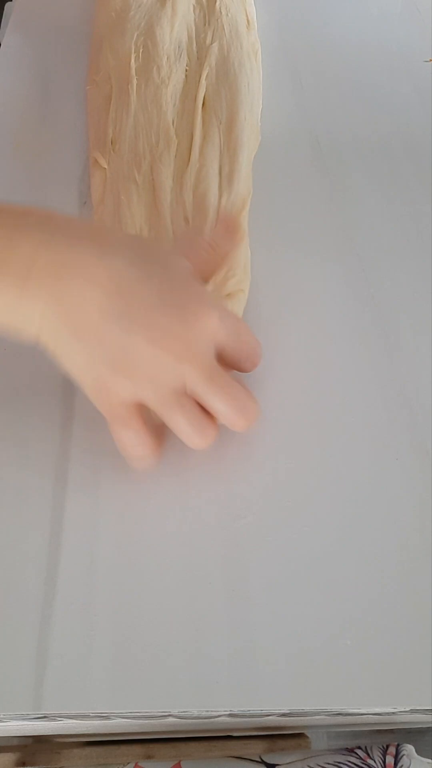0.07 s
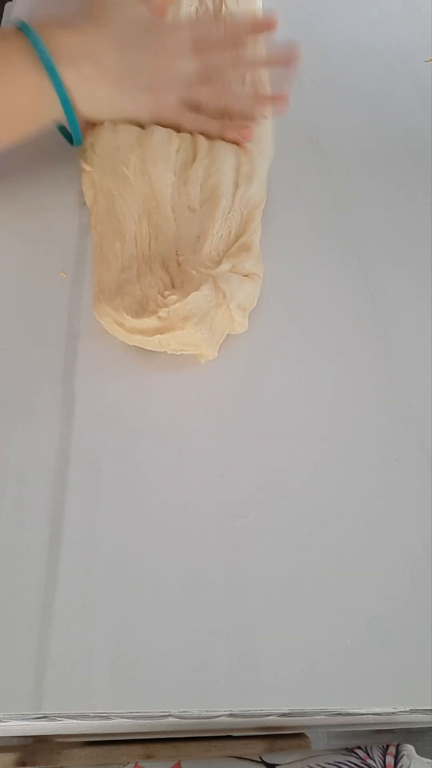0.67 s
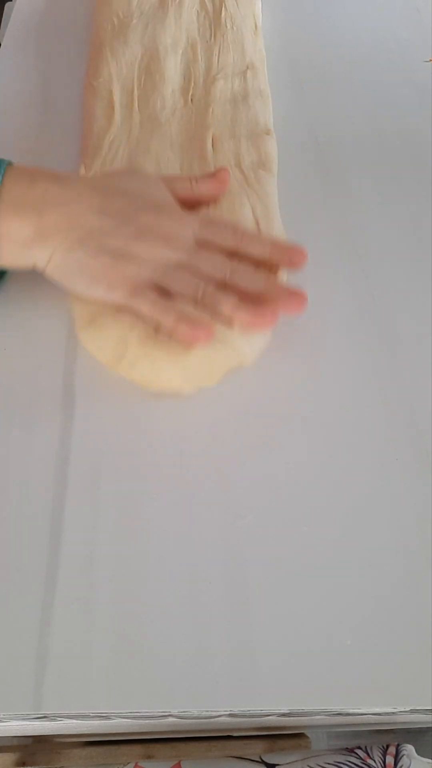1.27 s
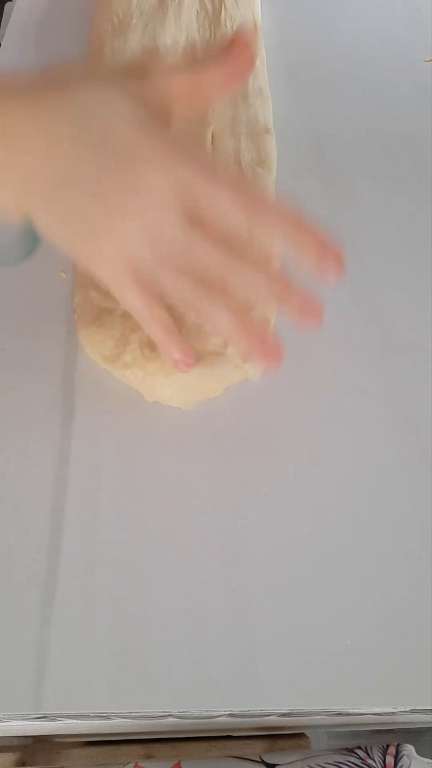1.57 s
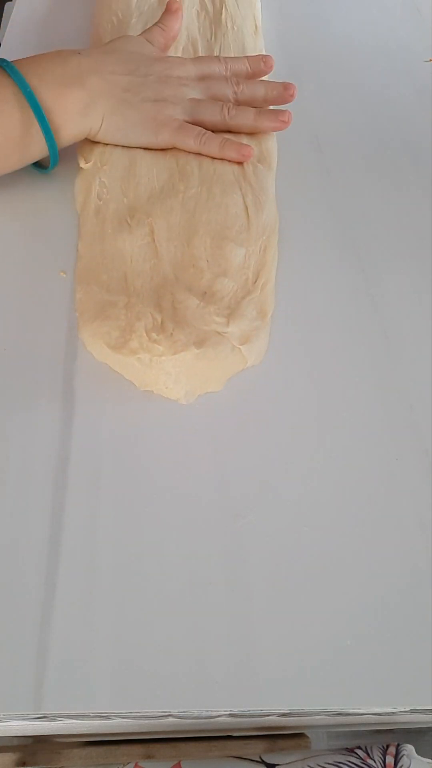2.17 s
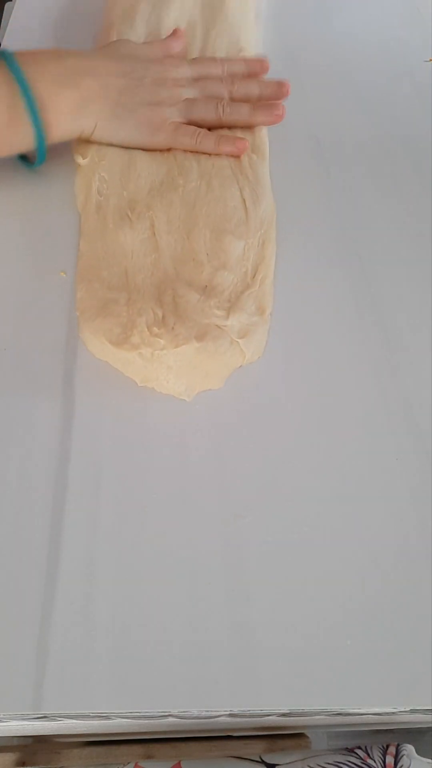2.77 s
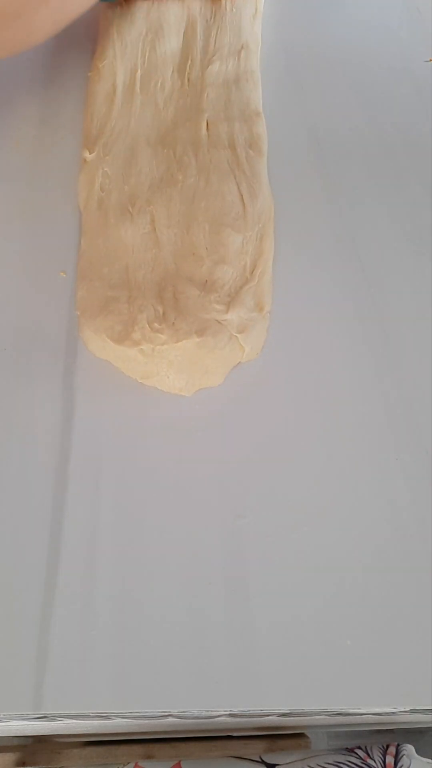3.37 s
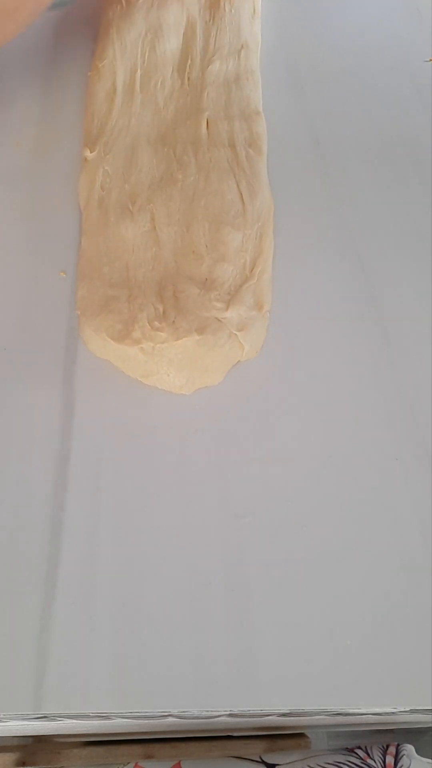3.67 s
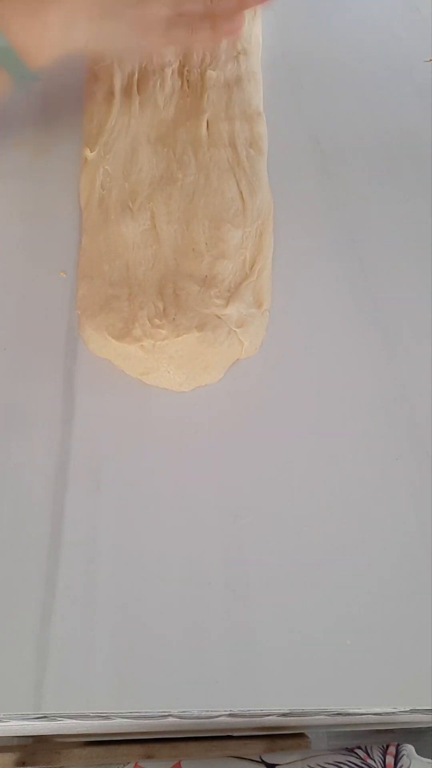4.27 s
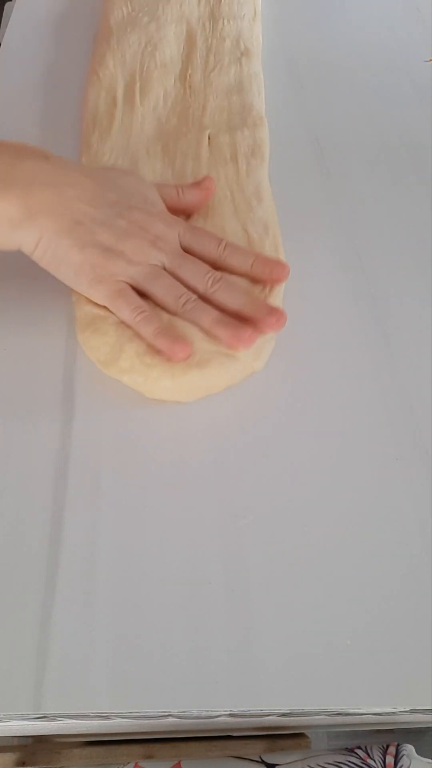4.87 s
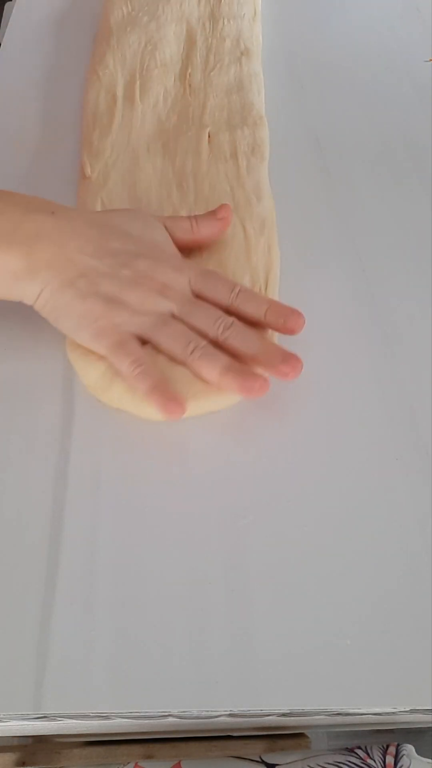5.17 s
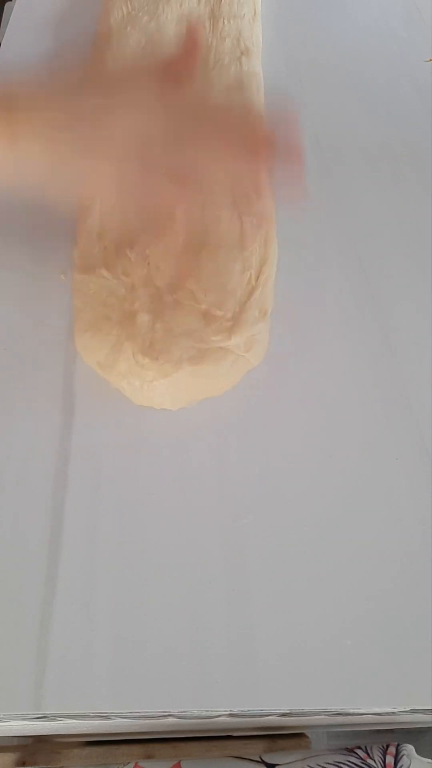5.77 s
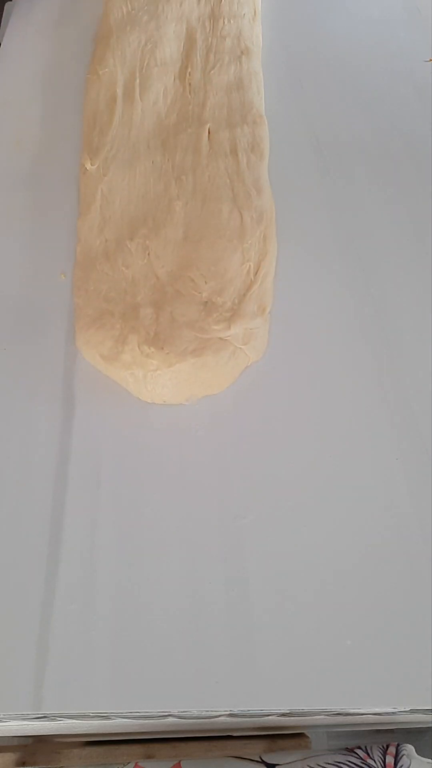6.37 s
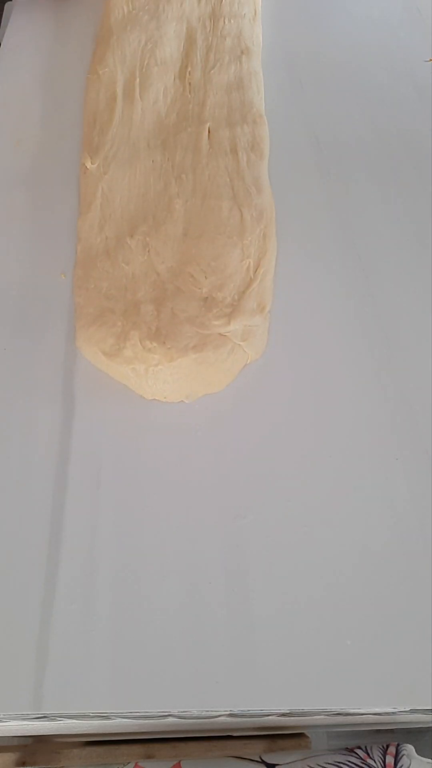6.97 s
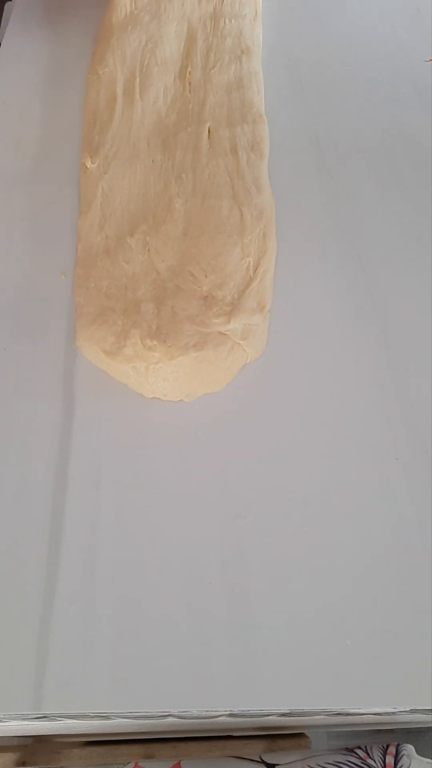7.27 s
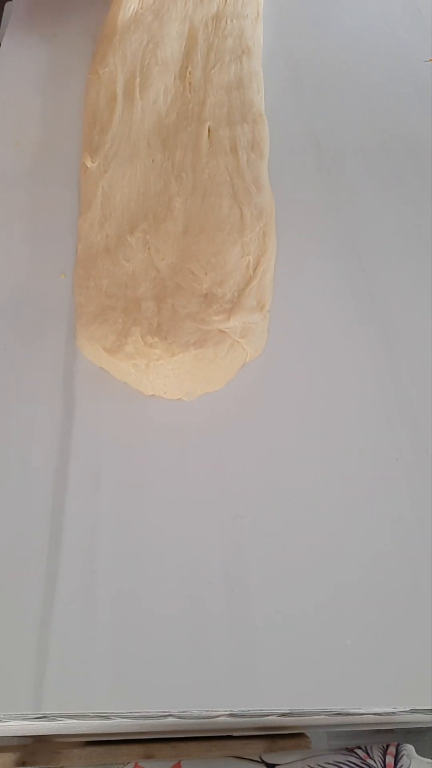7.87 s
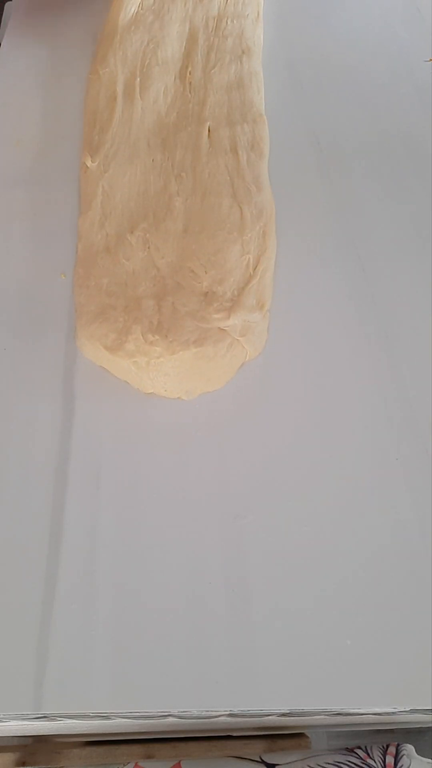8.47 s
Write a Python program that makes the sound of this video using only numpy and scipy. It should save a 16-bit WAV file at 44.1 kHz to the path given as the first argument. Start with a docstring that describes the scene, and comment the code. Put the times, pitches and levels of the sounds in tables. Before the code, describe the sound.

A hand pats soft dough on a worktop close to the microphone, each pat a low thump with a moist smack. A few lighter pats come first, then a run of harder slaps, with faint sticky peeling in between. Something hard clacks nearby midway and again after the slapping stops. The small kitchen rings briefly and an appliance hums faintly.

```python
"""In a small, hard-walled kitchen, a hand pats and slaps a long slab of soft dough on a worktop.
Each pat is a thump of squeezed air and a moist smack of skin; a harder one makes a shorter contact.
A moment later the palm peels off the sticky dough, and now and then it strokes along it.
Twice something hard clacks nearby. Worktop and room boom softly, and an appliance hums faintly."""
import sys
import numpy as np
from scipy import signal
from scipy.fft import rfft, irfft
from scipy.io import wavfile

SR = 44100
rng = np.random.default_rng(int(sys.argv[2]) if len(sys.argv) > 2 else 0)


def wav_out(sig):
    """Save sig, one row per channel (or a flat mono array), as 16-bit PCM at SR to the path in sys.argv[1]."""
    wavfile.write(sys.argv[1], SR, np.round(np.clip(np.atleast_2d(sig).T, -1, 1) * 32767).astype(np.int16))


N = 375291
TIME = np.arange(N) / SR
NEAR = np.arange(-1024, 3072) / SR   # seconds around one contact

# The hand landing on the dough. Each row: start in seconds, thud, thump and smack levels in dB,
# smack tilt in dB per octave, air pocket pitch in Hz, air pocket boost in dB.
PATS = [ (0.002, -28.5, -32.5, -29, 1.5, 930, 3.5), (0.567, -49.5, -46, -43.5, -0.5, 3860, -1),
        (0.924, -36.5, -36.5, -38.5, 2, 990, 6.5), (1.300, -43.5, -41.5, -37.5, 3, 900, 15.5),
        (1.331, -43.5, -42, -38.5, -1, 2250, 5.5), (1.56, -69, -58, -54, 3, 2000, -5),
        (1.875, -78, -69, -59.5, -7.5, 990, 6), (1.952, -81, -82, -64.5, -13, 790, 14),
        (2.082, -74, -70, -67, 10, 600, 28), (2.906, -65, -33, -36, 2.5, 477, 29.5),
        (2.923, -42, -34, -38, 1.5, 2260, 3), (3.358, -52.5, -53, -47, 0, 660, 9),
        (3.633, -33.5, -34.5, -36, 3, 500, 20), (3.908, -57, -48.5, -49, 1, 595, -5),
        (3.938, -27.5, -28, -24.5, -0.5, 635, 3), (4.2332, -45, -36.5, -30, 0.5, 2315, 2),
        (4.458, -28, -19, -25.5, 0.2, 2450, 2), (4.686, -25, -23, -23.5, -1, 2140, 5.5),
        (4.9072, -26.5, -29.5, -21, 1.5, 4120, 5.5), (5.192, -28.5, -26, -19, 0.2, 5210, 14),
        (5.306, -40.5, -28, -31.5, 0.25, 2970, 2.5), (5.666, -25.5, -18, -22, -0.6, 1500, 6),
        (5.685, -34.5, -14, -18.5, 3.6, 481, 16), (5.979, -60.5, -50, -43.5, -1.5, 466, 15.5),
        (6.023, -71, -46, -54.5, -2, 483, 5)]


def pats(room_equal_m=0.4):
    """Every pat is a deep thud and a thump under a smack; returns the direct sound and the room send."""
    # The hand works twice down the slab towards the microphone.
    # Each row: time in seconds, distance in metres.
    hand_distance = [(0.5, 0.39), (1.33, 0.16), (2.0, 0.32), (4.3, 0.31), (4.68, 0.26), (4.91, 0.13),
                     (5.3, 0.24), (5.9, 0.25)]
    direct, radiated = np.zeros((2, N))
    click = 1.0 * (NEAR == 0)   # over all directions the tiny contacts average to one smooth click
    for s, thud_db, thump_db, smack_db, *colour in PATS:
        body = from_db(thump_db) * thump(hz=288.6, swell_s=0.0028)
        body += from_db(thud_db) * thump(hz=165, swell_s=0.003)
        skin = skin_contacts(contact_time(smack_db))
        add(direct, s, body + from_db(smack_db) * smack(skin, *colour))
        room_share = np.interp(s, *np.transpose(hand_distance)) / room_equal_m   # farther is wetter
        add(radiated, s, body + room_share * from_db(smack_db) * smack(click, *colour))
    return direct, radiated


def thump(hz, swell_s, lag_s=0.0011):
    """Just after contact, air and dough give way under the palm: a few heavily damped swings."""
    t = np.maximum(NEAR - lag_s, 0)
    return unit_burst(t * np.exp(-t / swell_s) * np.cos(2 * np.pi * hz * t))


def smack(contact, tilt_db, pocket_hz, pocket_db, pocket_q=4.5):
    """Moist skin meets the dough; a trapped air pocket colours the sound."""
    # The tone of skin on dough. Each row: frequency in Hz, level in dB.
    smack_spectrum = [(100, -7), (300, -2), (600, 0), (1200, -7.5), (2400, -9), (4800, -10), (8000, -17),
                      (12000, -12.5), (16000, -23)]
    burst = coloured(contact, smack_spectrum, tilt_db)
    pocket = resonance(burst, pocket_hz, pocket_hz / pocket_q)
    return unit_burst(burst + (from_db(pocket_db) - 1) * pocket)


def skin_contacts(contact_s, skirt_db=-20, approach_ratio=1.3, settle_s=0.016):
    """The palm closes in a rush of tiny contacts, then settles."""
    closing = np.exp(-np.abs(NEAR) / contact_s)
    skirt = np.exp(np.where(NEAR < 0, NEAR / (approach_ratio * contact_s), -NEAR / settle_s))
    return grains(len(NEAR), spread_db=8) * (closing + from_db(skirt_db) * skirt)


def contact_time(smack_db, firm_db=-30, firm_s=0.0016, halving_db=7.5, fingertip_s=0.0007):
    """A harder pat flattens the dough sooner; fingertips alone touch only briefly."""
    if smack_db < -45.5:   # pats this light land on the fingertips
        return fingertip_s
    return firm_s * 2 ** ((firm_db - smack_db) / halving_db)


def brushes(ticks_per_s=350, tick_db=16, hiss_db=-10):
    """Skin slides and peels on the dough: a grainy rub with sticky ticks; peeling adds a fine hiss."""
    # Strokes along the dough. Each row: middle in seconds, half length in seconds, level in dB.
    strokes = [(1.597, 0.022, -54), (2.704, 0.069, -49.5), (7.779, 0.077, -69.5), (8.218, .04, -78.5)]
    # The tone of rubbing skin. Each row: frequency in Hz, level in dB.
    rub_spectrum = [(100, -7.5), (350, 7), (900, -10), (2500, -10), (5500, -9), (7800, -14), (12000, -3),
                    (16000, -8.5)]
    peel = peeling()
    stroke = sum(from_db(db) * swell(s, half_s) for s, half_s, db in strokes)
    ticks = (rng.random(N) < ticks_per_s / SR) * from_db(tick_db) * rng.standard_normal(N)
    rub = rms_one(coloured(rng.standard_normal(N) + ticks, rub_spectrum))
    hiss = rms_one(resonance(grains(N, spread_db=2.5), hz=10700, width_hz=4500))
    return (peel + stroke) * rub + from_db(hiss_db) * peel * hiss


def peeling(lift_after_s=0.175, under_smack_db=-13.5, limit_db=-57):
    """Envelope of the palm coming off the dough after each pat, unless another pat lands first."""
    level = 0
    next_times = [row[0] for row in PATS[1:]] + [np.inf]
    for (s, _, _, smack_db, *_), next_s in zip(PATS, next_times):
        if next_s > s + lift_after_s:
            peel_db = min(smack_db + under_smack_db, limit_db)   # a harder pat sticks more
            half_s = 11 * contact_time(smack_db)   # a slower one sticks longer
            level = level + from_db(peel_db) * swell(s + lift_after_s, half_s)
    return level


def clacks(chatter_s=0.0065):
    """A hard part snaps home with chatter, a bright ring and a dull knock; direct sound and room send."""
    # The clacks. Each row: start in seconds, level in dB, tilt in dB per octave, knock level in dB,
    # ring gain in dB.
    hits = [(3.652, -17, 0.6, -28, -6.5), (7.366, -20.5, 1, -38, 4)]
    # The tone of the hard contact. Each row: frequency in Hz, level in dB.
    clack_spectrum = [(150, -25), (400, -1.5), (1000, -6), (2200, -1), (5500, -1), (8000, -2.5),
                      (12000, 0.5), (16000, -11)]
    # The ring of the part. Each row: pitch in Hz, gain in dB, seconds to fall 60 dB.
    clack_modes = [(1896, 2.5, 0.04), (2698, 10, .07), (3560, 11, 0.068), (4170, 8, 0.031), (5770, 8, 0.04),
                   (7500, 7, .04), (8590, -13.5, 0.0243), (9930, 1.5, 0.048), (11200, -14, 0.05),
                   (12500, -10, 0.035)]
    direct, radiated = np.zeros((2, N))
    for s, db, tilt_db, knock_db, ring_db in hits:
        chatter = grains(len(NEAR), spread_db=-2.4) * (NEAR >= 0) * np.exp(-np.abs(NEAR) / chatter_s)
        snap = unit_burst(1.0 * (NEAR == 0)) + from_db(-6.5) * unit_burst(chatter)
        for track, contact in ((direct, chatter), (radiated, snap)):
            burst = coloured(contact, clack_spectrum, tilt_db)
            ringing = from_db(ring_db) * ring(burst, clack_modes)
            add(track, s, from_db(db) * unit_burst(burst + ringing))
            add(track, s, from_db(knock_db) * thump(hz=325, swell_s=0.0041))
    return direct, radiated


def boom(x, level_db=-5, delay_s=0.00569):
    """Worktop and room ring on in their low modes just after each contact."""
    # The low resonances. Each row: pitch in Hz, gain in dB, seconds to fall 60 dB.
    low_modes = [(86, 8, .36), (122, -3, .26), (148, 6, .33), (175, 8, .3), (207, 1, .3), (242, 1, .23),
                 (297, 4, .28), (324, 5, .31), (360, 2, .25), (442, 2, .24), (513, 3, .26)]
    ringing = np.interp(TIME - delay_s, TIME, ring(x, low_modes), left=0)
    return from_db(level_db) * from_left(ringing, right_db=-1.5)


def kitchen(x, first_echo_s=0.003, build_s=0.001, tail_s=0.7, right_db=-3):
    """Dense wall reflections, dying at their own pace in each octave."""
    # The reverb's length. Each row: frequency in Hz, seconds to fall 60 dB.
    room_t60 = [(100, .34), (300, .31), (800, .39), (2000, .42), (5000, .42), (9000, .39), (15000, .34)]
    # The reverb's tone. Each row: frequency in Hz, gain on the room send in dB.
    room_db = [(60, -13.5), (125, -11), (250, -4), (500, -3), (1000, 2.5), (2500, 3), (5000, 0.5),
               (9000, 0.5), (15000, -2)]
    t = np.arange(int(tail_s * SR)) / SR
    hz = np.fft.rfftfreq(len(t), 1 / SR)
    white = rfft(rng.standard_normal((2, len(t))))
    centres = np.geomspace(62, 16000, 9)
    onset = 1 - np.exp(-np.maximum(t - first_echo_s, 0) / build_s)
    response = 0
    for centre, share in zip(centres, np.eye(len(centres))):
        band = irfft(white * np.interp(np.log(hz + 1), np.log(centres), share), len(t))
        decay = onset * from_db(-60 * t / at_hz(room_t60, centre))
        response = response + band * decay / np.linalg.norm(decay) * from_db(at_hz(room_db, centre))
    return signal.fftconvolve(x[None], response, axes=1)[:, :N] * from_db([[0], [right_db]])


def appliance(ride_db):
    """An appliance on the left hums and whines in a few wavering tones."""
    # Its tones. Each row: pitch in Hz, width in Hz, resting level in dB, right side gain in dB,
    # share of the level ride from 0 to 1.
    tones = [(322.3, 5.1, -70.5, -1.5, 0.8), (639.6, 4.5, -70, -9, 0), (4440, 520, -83, -6.5, 0.2),
             (5000, 99, -79, -1.5, 0.3), (6900, 150, -91.5, 2, 0.8)]
    hum = 0
    for hz, width_hz, db, right_db, share in tones:
        # a drifting phase widens the tone
        wander = np.cumsum(rng.standard_normal(N)) * np.sqrt(2 * np.pi * width_hz / SR)
        tone = rms_one(np.sin(2 * np.pi * hz * TIME + wander))
        hum = hum + from_left(from_db(db + share * ride_db) * tone, right_db)
    return hum


def room_air(ride_db, resting_db=-68, ride_share=0.32, right_db=-4, shared_below_hz=600):
    """A soft bed of room air, alike on both sides in the bass."""
    # The room tone. Each row: frequency in Hz, level in dB.
    air_spectrum = [(20, -12.5), (45, 4), (80, 2.5), (150, 0), (230, -7.5), (330, -2), (400, -3),
                    (520, -3.5), (950, -18), (3000, -25), (8000, -25), (10500, -19.5), (16000, -31)]
    left, apart = coloured(rng.standard_normal((2, N)), air_spectrum)
    right = apart + signal.lfilter(*signal.butter(1, shared_below_hz, fs=SR), left - apart)
    air = np.array([rms_one(left), from_db(right_db) * rms_one(right)])
    return from_db(resting_db + ride_share * ride_db) * air


def background():
    """The whole background fades in at the start; later the hum swells briefly a few times."""
    # The level ride: first the fade-in, then the brief swells.
    # Each row: middle in seconds, half length in seconds, full change in dB.
    level_ride = [(0.25, 0.9, -10), (2.13, 0.1, 8.5), (6.893, 0.34, 3), (8.204, 0.19, 9.5)]
    ride_db = sum(db * swell(s, half_s) for s, half_s, db in level_ride)
    return room_air(ride_db) + appliance(ride_db)


def from_db(db):
    return 10 ** (np.asarray(db) / 20)


def rms_one(x):
    return x / np.sqrt(np.mean(x ** 2) + 1e-20)


def unit_burst(x):
    """Scale a burst to the energy of 10 ms at rms 1."""
    return x / np.sqrt(np.sum(x ** 2) / (SR / 100) + 1e-20)


def at_hz(points, hz):
    """Read a table on a log-frequency axis."""
    table_hz, value = np.transpose(points)
    return np.interp(np.log(hz + 1), np.log(table_hz), value)


def coloured(x, spectrum, tilt_db=0):
    """Shape x with a spectrum, tilted above 500 Hz by tilt_db an octave around 2 kHz."""
    hz = np.fft.rfftfreq(x.shape[-1], 1 / SR)
    octaves = np.log2(np.maximum(hz, 500) / 2000)
    return irfft(rfft(x) * from_db(at_hz(spectrum, hz) + tilt_db * octaves), x.shape[-1])


def resonance(x, hz, width_hz):
    """Two-pole band-pass with gain 1 at its peak."""
    r = np.exp(-np.pi * width_hz / SR)
    feedback = [1, -2 * r * np.cos(2 * np.pi * hz / SR), r * r]
    return signal.lfilter(np.array([1, 0, -1]) * (1 - r * r) / 2, feedback, x + 1e-18)


def ring(x, modes):
    """Drive parallel decaying modes of alternating polarity."""
    return sum((-1) ** k * from_db(db) * resonance(x, hz, np.log(1000) / (np.pi * t60))
               for k, (hz, db, t60) in enumerate(modes))


def grains(size, spread_db):
    """Tiny contacts of uneven strength."""
    return rng.standard_normal(size) * from_db(spread_db * np.clip(rng.standard_normal(size), -2, 2))


def swell(s, half_s):
    """A smooth rise and fall of height 1 around s."""
    return np.exp(-np.minimum(((TIME - s) / half_s) ** 2, 100))


def add(track, s, burst):
    """Lay a burst into the track with its contact at s."""
    at = round(s * SR) + np.round(NEAR * SR).astype(int)
    inside = (at >= 0) & (at < N)
    track[at[inside]] += burst[inside]


def from_left(x, right_db, shadow_hz=5000, lag_s=0.00024):
    """A source on the left reaches the right microphone later and duller, with its own gain."""
    shadowed = signal.lfilter(*signal.butter(1, shadow_hz, fs=SR), x)
    return np.array([x, from_db(right_db) * np.roll(shadowed, round(lag_s * SR))])


def scene():
    """Hand and clacks sit to the left and feed the boom and the kitchen reverb, over the background."""
    hand, hand_radiated = pats()
    clack, clack_radiated = clacks()
    rub = brushes()
    direct = from_left(hand + rub, right_db=-8) + from_left(clack, right_db=-17.5)
    radiated = hand_radiated + rub + from_db(-2.5) * clack_radiated
    return direct + boom(radiated) + kitchen(radiated) + background()


def record(dry):
    """The microphones lose the deepest bass; the top is cut steeply."""
    low_cut_hz, high_cut_hz = 78, 15900
    thin = signal.sosfilt(signal.butter(2, low_cut_hz, "high", fs=SR, output="sos"), dry)
    return signal.sosfilt(signal.ellip(10, .2, 80, high_cut_hz, fs=SR, output="sos"), thin)


dry = scene()
out = record(dry)
wav_out(out)
```